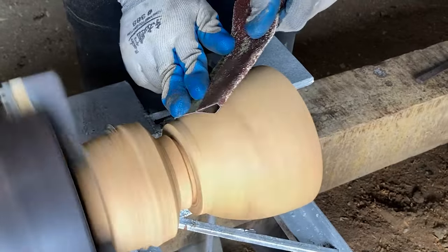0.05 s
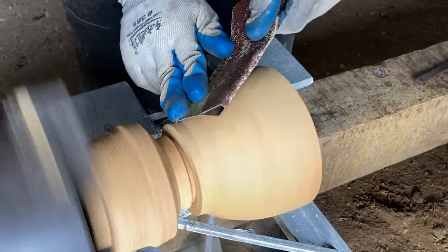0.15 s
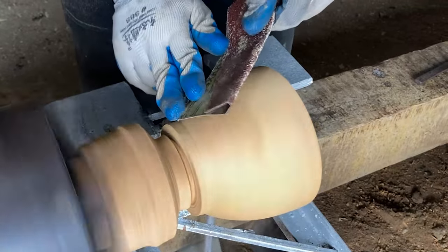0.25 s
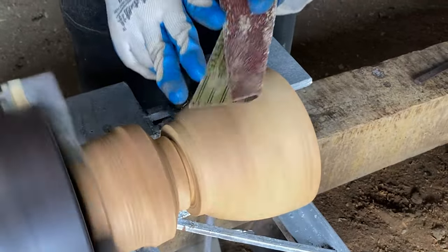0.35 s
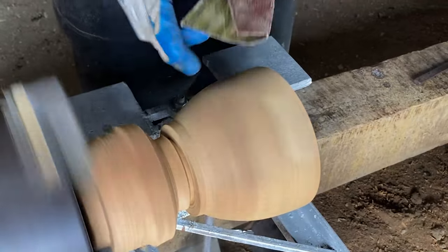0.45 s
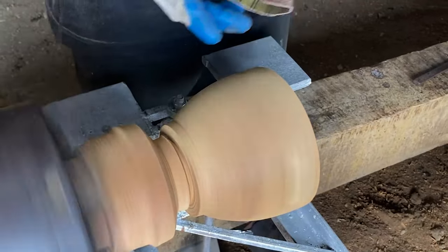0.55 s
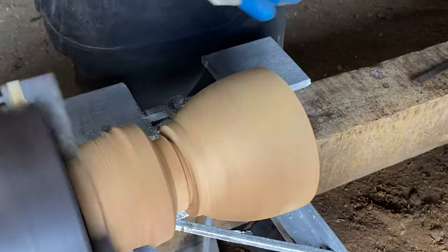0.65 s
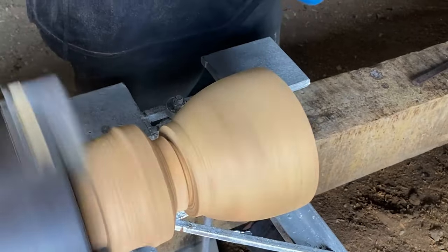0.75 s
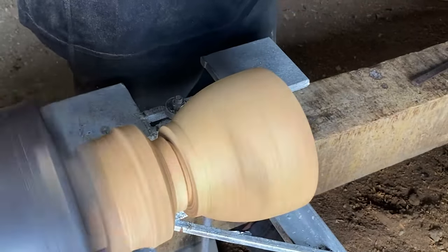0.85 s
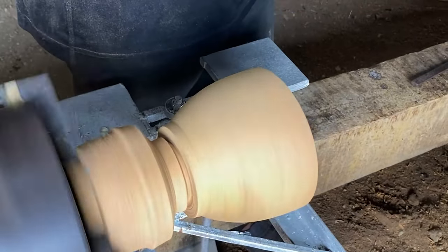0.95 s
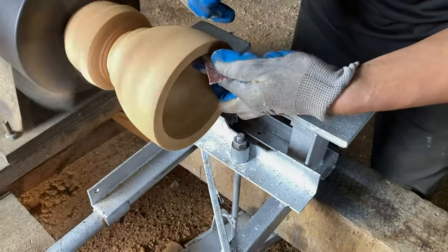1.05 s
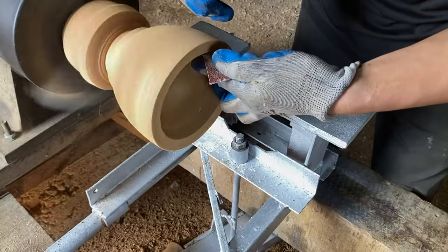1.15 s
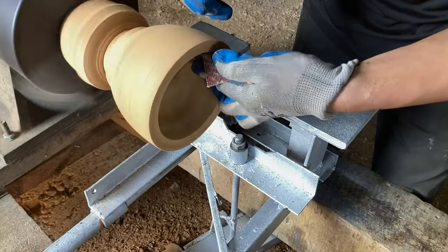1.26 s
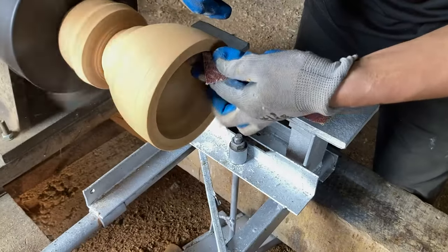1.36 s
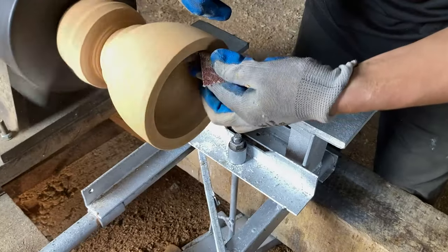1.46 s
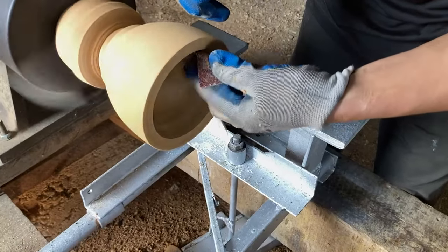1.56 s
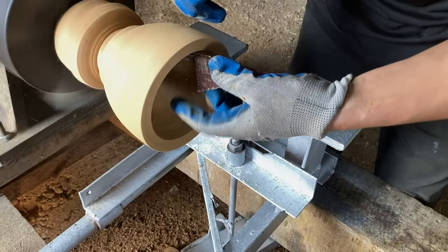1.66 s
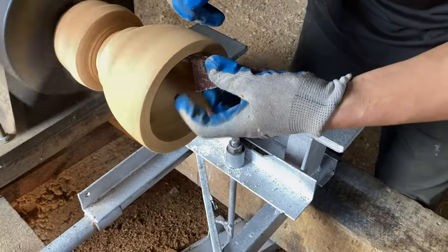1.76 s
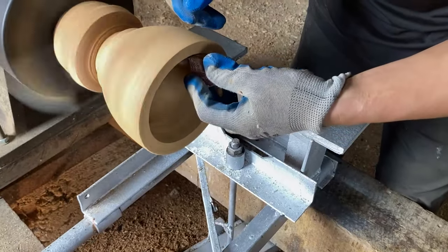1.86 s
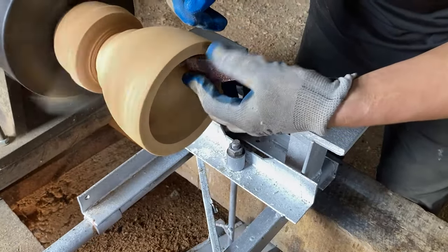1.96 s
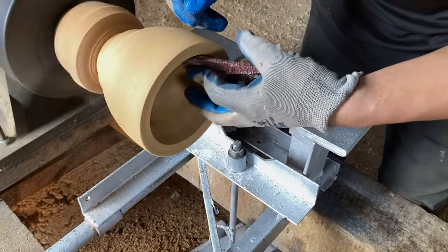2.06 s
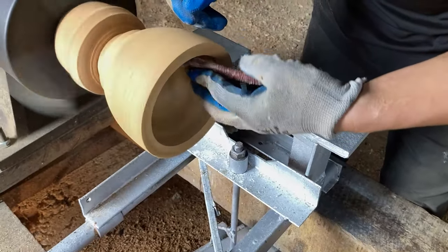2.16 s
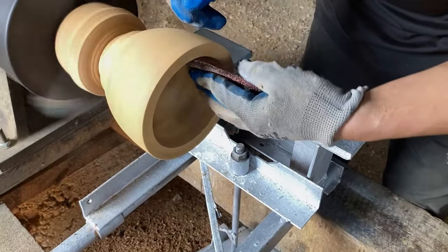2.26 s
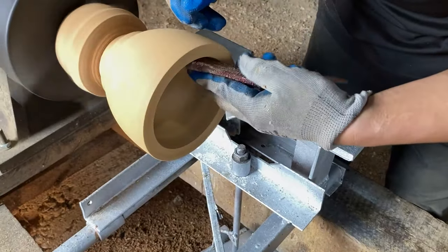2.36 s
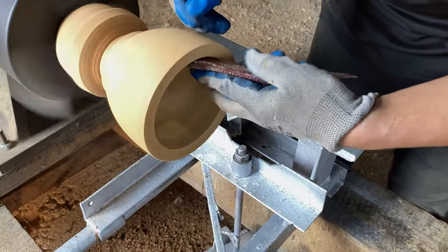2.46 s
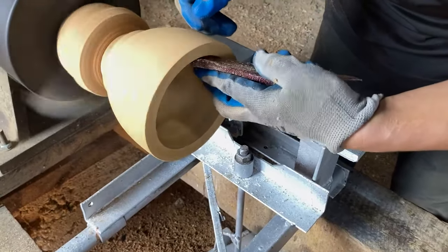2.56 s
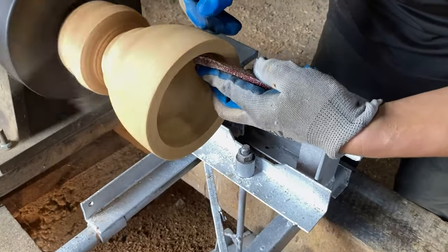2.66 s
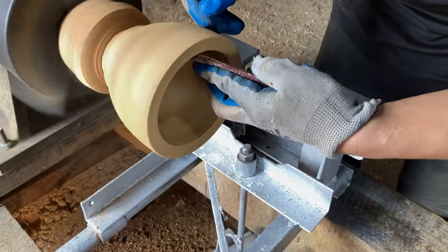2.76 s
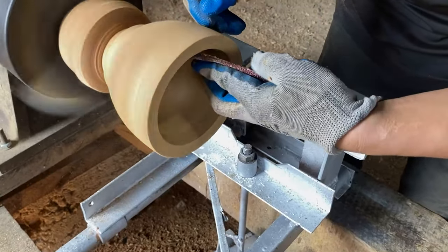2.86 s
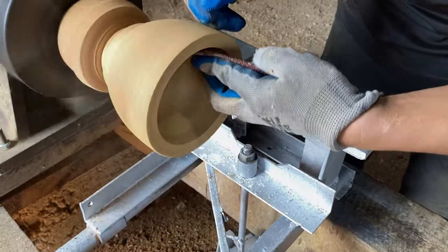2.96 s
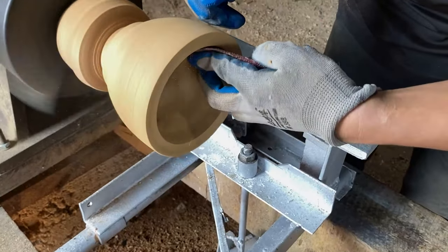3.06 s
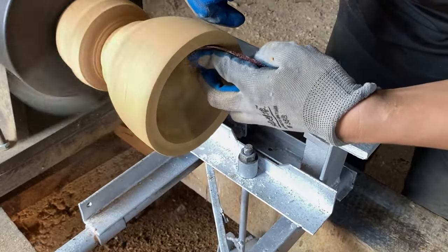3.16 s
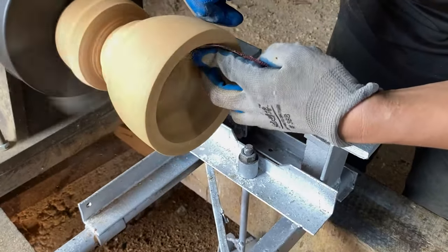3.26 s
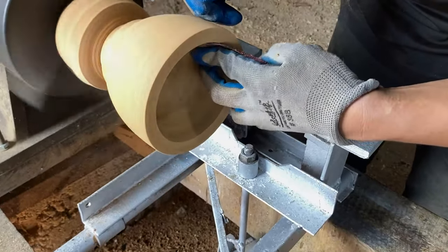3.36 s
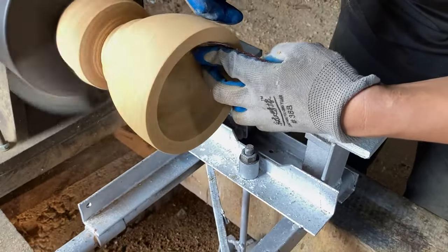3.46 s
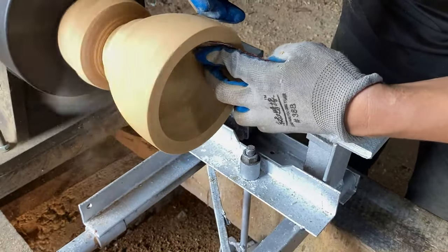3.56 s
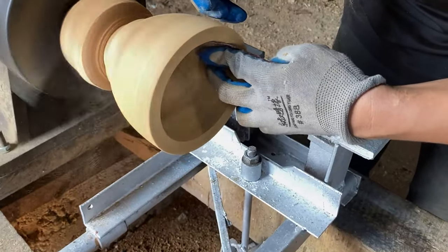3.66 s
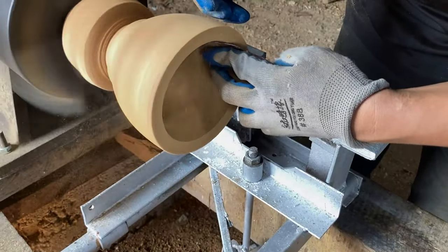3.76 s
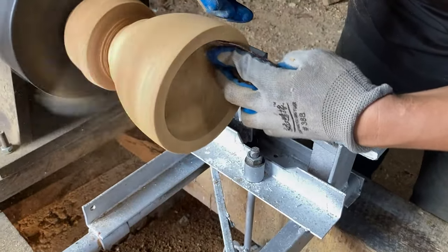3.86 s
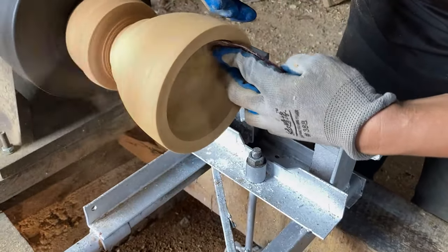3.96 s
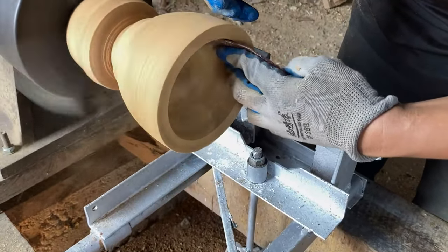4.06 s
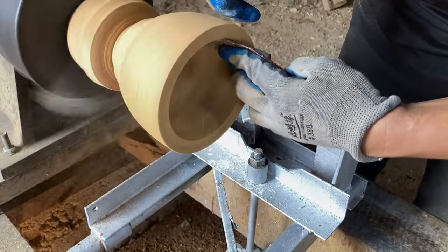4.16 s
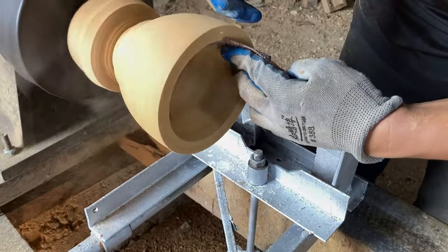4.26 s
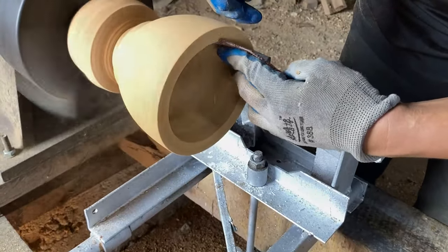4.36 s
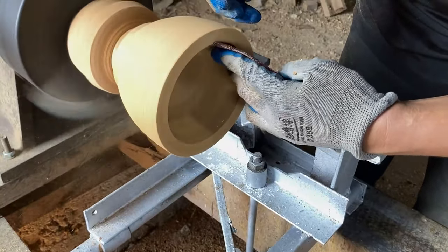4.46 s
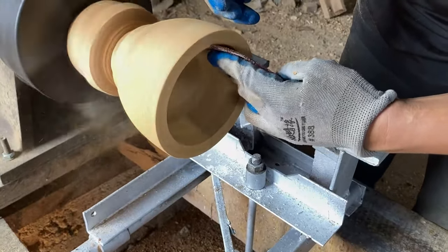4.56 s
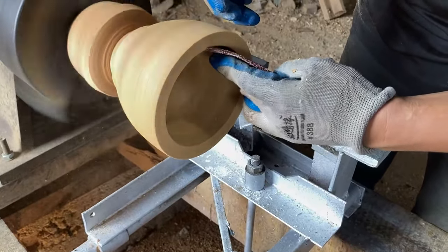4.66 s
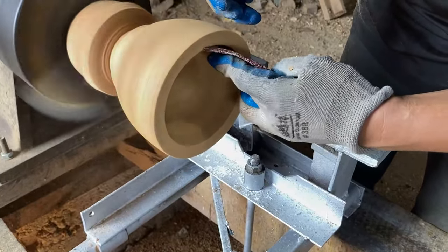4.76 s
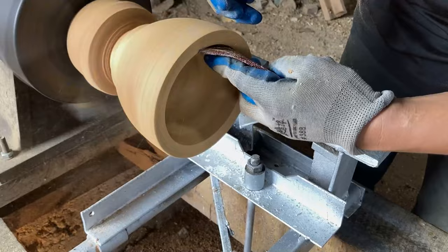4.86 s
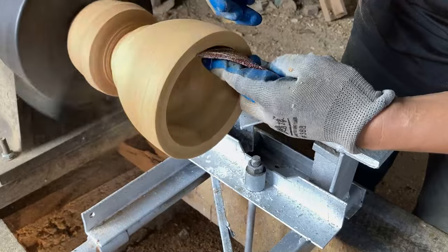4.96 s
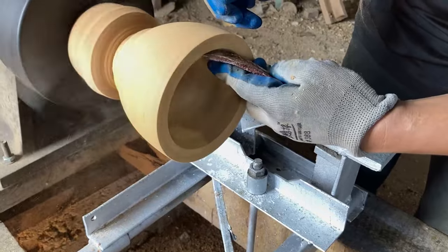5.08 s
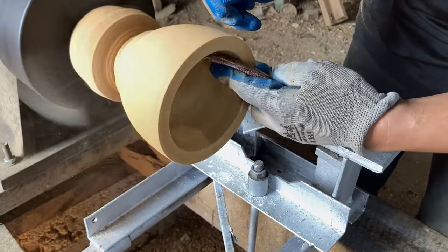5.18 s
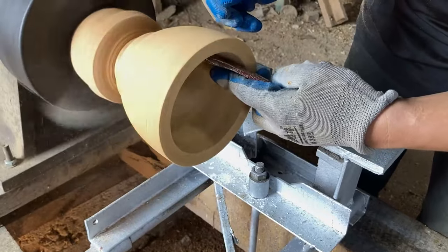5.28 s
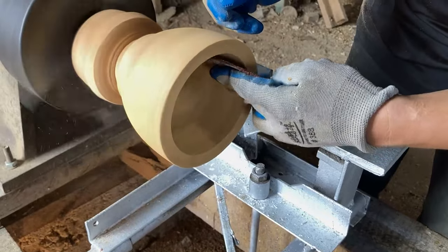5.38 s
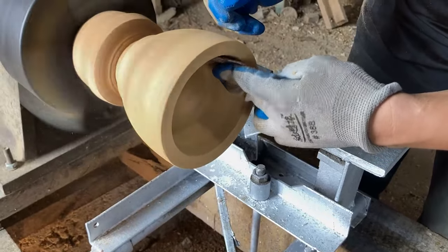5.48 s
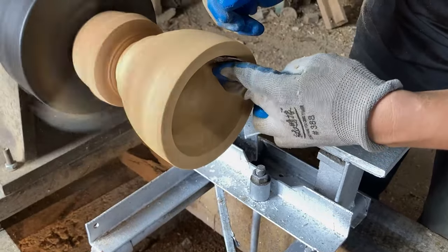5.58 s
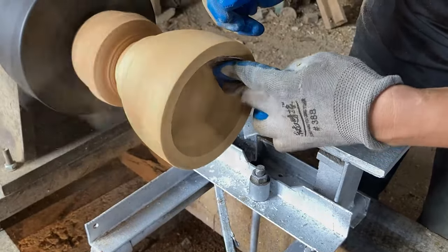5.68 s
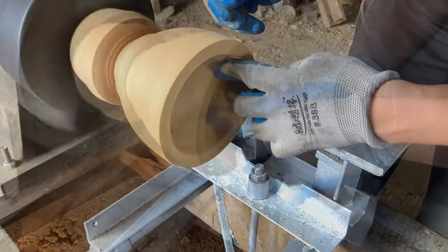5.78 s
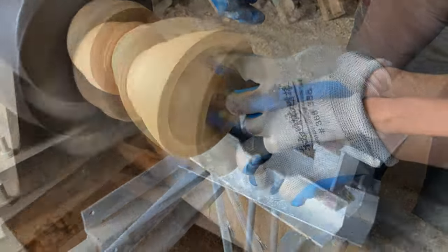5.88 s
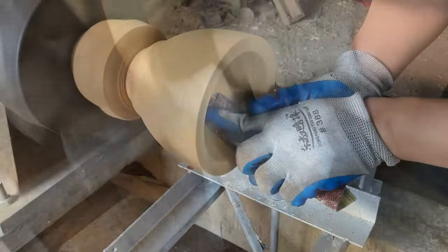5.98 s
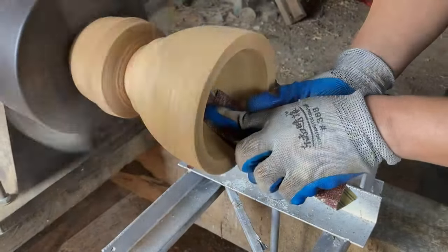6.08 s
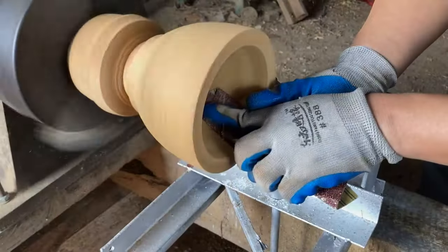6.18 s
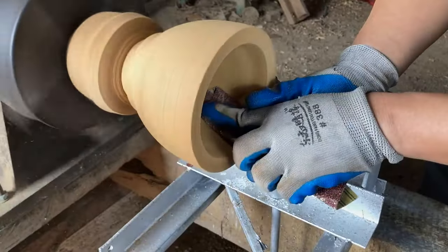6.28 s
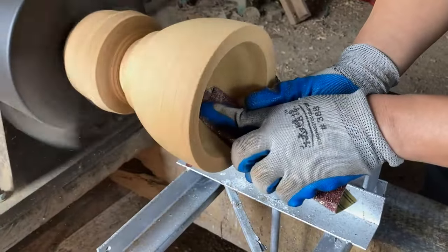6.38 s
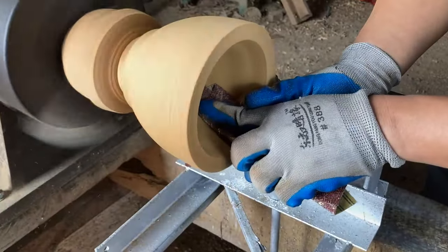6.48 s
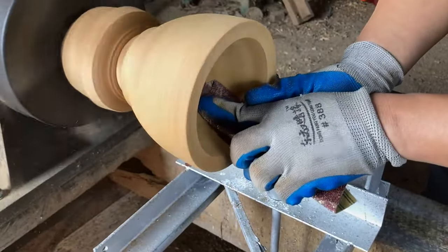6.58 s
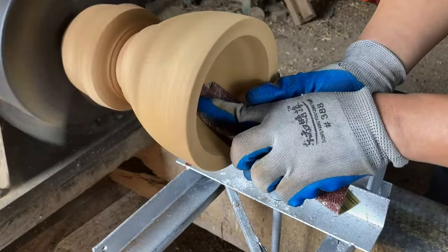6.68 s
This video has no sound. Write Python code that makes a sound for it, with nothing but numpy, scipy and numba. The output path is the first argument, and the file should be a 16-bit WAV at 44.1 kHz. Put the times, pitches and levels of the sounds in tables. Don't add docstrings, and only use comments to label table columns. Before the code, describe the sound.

A wood lathe runs throughout, close to a stereo phone microphone in an open workshop: a steady, slightly wavering motor hum around a nasal mid pitch, with low frame rumble and fine bearing rattle. From 0 to 0.3 s sandpaper hisses on the outside of a spinning wooden cup, swelling briefly, then lifting away by 0.4 s. The machine runs alone, with barely audible tiny squeaks, until an abrupt cut at 1.07 s. Now grit rubs inside the cup's mouth, brighter and hollow, with woody ringing and a fast throb each turn. Around 1.3 to 2 s it is jerky, with small groans, lifts and rough catches. It presses harder from 2 to 4 s, with a sharp squeal at 2.9 to 3 s. A low groan comes near 4 s; faint knocks near 5 s. Rubbing thins around 5.3 s, partly returns by 5.9 s, then softens, still continuing at the end, about 6.7 s.

```python
import sys
import numpy as np
from scipy import signal
from scipy.fft import rfft, irfft, next_fast_len
from scipy.io import wavfile
from scipy.ndimage import uniform_filter1d, map_coordinates
from numba import njit

SR = 44100
rng = np.random.default_rng(int(sys.argv[2]) if len(sys.argv) > 2 else 0)


def output_pcm(signal):
    pcm = np.clip(np.atleast_2d(signal).T, -1, 1) * 32767
    wavfile.write(sys.argv[1], SR, np.round(pcm).astype(np.int16))


def to_linear_factor(level_db):
    exponent = np.asarray(level_db, float) / 20
    return 10 ** exponent


N = 296793
T = np.arange(N) / SR
M = next_fast_len(N)
F = np.arange(M // 2 + 1) * SR / M
JUMP_S = 1.0712
INSIDE = T > JUMP_S
SPINDLE_HZ = 11.06

# freq_hz, right_lead_rad, likeness_0_1, left_minus_right_db
PORTS = [(0, .35, 0.995, 0), (90, 0.3, 1, 0.2), (367, 0.15, 0.99, 0.2), (782, -1.43, 0.81, 1.5),
         (1180, -1.46, 1, 4.5), (1654, -0.6, 0.4, 0), (1800, -2.5, 0.07, 0), (2590, -0.1, 0, 4.5),
         (3440, -2, 0.64, -0.5), (3660, -2.2, 0.4, 0.1), (3900, -2.0, 0.4, 0.1), (4370, -1.8, 0.21, 0.5),
         (5500, -2, 0.53, -0.5), (5920, -2, 0.9, -1), (6200, -2, 0.24, -4.5), (6830, -1, 1, 0.5),
         (8400, 0, 0.7, -0.5), (8930, 0, 1, -0.5)]
# start_s, pressure_as_hiss_db
STROKE = [
    (0, -36),
    (.14, -33),
    (.23, -36.5),
    (.3, -46),
    (.35, -62),
    (.42, -90),
]


@njit
def svf(x, hz, width):
    y, b, l = np.empty(len(x)), 0., 0.
    for i in range(len(x)):
        g, k = np.tan(np.pi * hz[i] / SR), width[i] / hz[i]
        v = (b + g * (x[i] - l)) / (1 + g * (g + k))
        b, l, y[i] = 2 * v - b, l + 2 * g * v, k * v
    return y


def unit(x):
    return x / np.sqrt(np.mean(x ** 2))


def curves(tables):
    s, *columns = np.vstack(tables).T
    return [np.interp(T, s, column) for column in columns]


def walk(rate):
    hold = int(SR / rate)
    held = np.repeat(rng.standard_normal(N // hold + 1), hold)
    return 1.08 * uniform_filter1d(uniform_filter1d(held, hold), hold)[:N]


def steps(rows, rest, slew_s):
    out = np.full(N, 1. * rest)
    for start, end, value in rows:
        out[(T >= start) & (T < end)] = value
    return uniform_filter1d(out, int(slew_s * SR), mode="nearest")


def dips(rows):
    return sum(depth * np.exp(-((T - s) / length) ** 2) for s, depth, length in rows)


def colour(x, table):
    hz, db = np.transpose(table)
    gain = to_linear_factor(np.interp(np.log(F + 1), np.log(hz), db))
    return unit(irfft(rfft(x, M) * gain, M)[:, :N])


def ring(level, hz, width, flicker_db=1.5, rate=18):
    hz, width = hz * np.ones(N), width * np.ones(N)
    rows = rng.standard_normal((2, N)) * level / np.sqrt(width)
    rows = np.array([svf(svf(row, hz, width), hz, 1.7 * width) for row in rows])
    return unit(rows) * to_linear_factor(flicker_db * walk(rate))


def sandpaper():
    # freq_hz, density_db_per_hz
    hiss_spectrum = [(5000, -42), (8500, -3), (10500, -2), (12500, -5), (14500, -5.5), (16000, -12.5)]
    # freq_hz, width_hz, gain_db
    cup_modes = [(3723, 100, 5), (5370, 100, 3), (5730, 180, 1.5), (6450, 170, -4), (7340, 1300, 4)]
    # start_s, width_factor
    grips = [
        (0, 4.5),
        (1.07, 2.2),
        (1.3, 1.3),
        (2.2, .9),
        (3.45, 1.4),
        (4.2, 1.15),
        (5.22, 2.5),
        (6.0, 3.4),
    ]
    # start_s, wall_hz, rim_hz, wall_db, rim_db, middle_db, bed_db
    fingers = [(1.08, 3280, 2600, -4.5, 2.5, 3.5, 0.5), (1.45, 3350, 2620, 6, -6.5, -6, 1),
               (1.56, 3420, 2640, -4, -0.5, -11, 2), (1.8, 3330, 2700, 0, 3, -3.5, -2),
               (1.97, 3280, 2500, 4.5, -3, -2, -1.5), (2.2, 3250, 2560, 2.5, -3, 0, 2.5),
               (2.42, 3200, 2600, 1.5, -1, 0.5, 2.5), (2.6, 3190, 2540, -2.5, 2, -1, 4),
               (2.95, 3256, 2530, 4, -2, -1.5, 1.5), (3.15, 3280, 2640, 6.5, -3.5, -6.5, -2),
               (3.38, 3310, 2560, 6, 1, -3, -2), (3.48, 3250, 2610, -0.5, 1, 1.5, 2),
               (3.9, 3210, 2530, -2.5, 2, -1.5, 2.5), (4.45, 3240, 2490, 1, -3, -1.5, -3),
               (5.2, 3130, 2600, -2.5, 1.5, 1, -5), (5.7, 3200, 2590, 2, 4.5, -1, -3),
               (6.0, 3250, 2570, 2, -1.5, 0, 2), (6.73, 3150, 2620, -2.5, -6.5, -5, -2)]

    hiss_db, (bite_db, cavity_db, wall_db, middle_db, low_db, bed_db, rim_db) = hand()
    damp = steps([(s, 9, factor) for s, factor in grips], 1, .12)
    mute_db = 0.5 * np.log2(damp) * INSIDE
    wall_hz, rim_hz, wall_held_db, rim_held_db, middle_held_db, bed_held_db = curves([fingers])
    wall_db = wall_db - mute_db + wall_held_db * INSIDE
    middle_db = middle_db - mute_db + middle_held_db * INSIDE
    rim_db = rim_db + rim_held_db * INSIDE
    bed_db = bed_db + bed_held_db * INSIDE

    grit = to_linear_factor(1.7 * rng.exponential(1, N)) * grain() * rasp() * catches(hiss_db)
    hiss = to_linear_factor(3.44) * colour(rng.standard_normal((2, N)) * grit, hiss_spectrum)
    rub = to_linear_factor(hiss_db) * (hiss + gaps(grit))
    bite_hz = np.where(INSIDE, 8100, 7050) * (1 + 0.096 * walk(7.8))
    rub = rub + to_linear_factor(bite_db) * ring(grit, bite_hz, 3700)
    rub = rub + to_linear_factor(cavity_db) * ring(grit, 4160 * (1 + 0.07296 * walk(7.6)), 3200)

    cup_db = sum(db / (1 + (2 * (F - hz) / width) ** 2) for hz, width, db in cup_modes)
    rub = np.where(INSIDE, to_linear_factor(-2.0) * irfft(rfft(rub, M) * to_linear_factor(cup_db), M)[:, :N], rub)

    grit = grit * grain(depth_db=0.97) * to_linear_factor(0.65 * walk(10))
    wall = ring(grit, wall_hz * (1 + 0.005 * walk(8.3)), 170 * damp, flicker_db=0.9, rate=28)
    wall = wall + to_linear_factor(-9.0) * ring(grit, 2860, 740)
    body = to_linear_factor(middle_db) * ring(grit, 1655, 120 * damp, flicker_db=2.2)
    body = body + to_linear_factor(low_db) * ring(grit, 1120.0, 385.0, flicker_db=2.0)
    body = body + to_linear_factor(middle_db - 4.0) * ring(grit, 1415, 340)
    body = body + to_linear_factor(bed_db) * ring(grit, 2050.0, 600)
    body = body + to_linear_factor(rim_db) * ring(grit, rim_hz * (1 + 0.0094 * walk(6.2)), 230 * damp)
    return (rub + to_linear_factor(wall_db) * wall + body + squeals(grit)) * touching()


def hand():
    # start_s, pressure_as_hiss_db, cover_0_1, wall_freedom_0_1, depth_0_rim_1_deep
    poses = [(1.072, -41, 0.63, 0.77, 0.54), (1.36, -36, 0.23, 0, 0), (1.6, -39, 0.3, 0.9, 0.61),
             (2.04, -34, 0.37, 0.46, 0.3), (2.76, -36, 0.41, 1, 1), (3.2, -34.5, 0.61, 0.78, 0.38),
             (3.4, -33.5, 0.56, 0.89, 0), (3.56, -36.0, 0.72, 0.7, 0), (4.0, -34.5, 0.76, 0.25, 0.71),
             (4.24, -39, 0.7, 0.16, 1.0), (4.6, -38, 0.5, 0.39, 0.86), (4.96, -38.5, 0.77, 0.35, 0.89),
             (5.32, -46.5, 0.01, 0.8, 0), (5.6, -40, 0.93, 0.64, 0.63), (5.92, -37.5, 0.5, 0.62, 0.15),
             (6.04, -40, 0.55, 0.71, 0.45), (6.32, -43, 0.43, 0.52, 0.99), (6.73, -43.5, 0.06, 0.83, 0.67)]
    # level_db, pressure_share, covered_db, free_db, deep_db
    parts = [
        (-34.5, 1, 0.5, 1, -0.7),
        (-40, 0.75, 9, 4.25, 1),
        (-44.5, 0.79, -5.5, 14, 1.2),
        (-51, 0.82, -2.5, 9, 7.5),
        (-44, 1, -7.5, 2, 3.8),
        (-33, 0.58, -22, -4, 2.5),
        (-39, 0.52, -2.1, 6.5, -1.5),
    ]
    outside_parts = [-40.5, -41, -49, -52.5, -57, -54, -44.5]
    # centre_s, loss_db, length_s
    lifts = [(1.265, 10, 0.027), (1.46, 7, 0.051), (1.808, 4, 0.024), (1.915, -1.5, .015),
             (2.03, -3, 0.011), (2.57, 1.5, .02), (2.73, 3, .016), (2.835, 0, .015), (2.93, 1.5, 0.011),
             (3.02, 3, 0.0051), (3.068, 3.5, 0.018), (3.125, 0.5, 0.022), (5.262, 2, 0.041)]
    # centre_s, cover_lost_0_1, length_s
    peeks = [
        (1.2, 0.1, 0.04),
        (1.33, 0.11, 0.017),
        (2.33, 0.27, 0.11),
        (2.62, 0.04, 0.057),
        (2.98, 0.3, 0.018),
        (3.95, 0.04, .05),
    ]

    inside_db, *pose = curves([poses])
    hiss_db = np.where(INSIDE, inside_db, curves([STROKE])[0]) - dips(lifts)
    pose[0] = pose[0] - dips(peeks)
    excess_db = hiss_db + 38
    part_levels = []
    for (db, share, *tilt_db), out_db in zip(parts, outside_parts):
        posed_db = np.where(INSIDE, db + np.dot(tilt_db, pose), out_db)
        part_levels.append(posed_db + share * excess_db)
    return hiss_db, part_levels


def touching():
    return 1. - (T > STROKE[-1][0]) * (T < JUMP_S)


def grain(depth_db=0.35, count=3):
    bumps = uniform_filter1d(rng.standard_normal((count, 48)), 3, mode="wrap") * np.sqrt(3)
    place = (T * SPINDLE_HZ % 1) * 48
    turn = 0
    for bump in bumps:
        height = np.interp(place, np.arange(49), np.append(bump, bump[0]))
        turn = turn + (0.69 + 1.56 * walk(0.66)) * height
    return to_linear_factor(depth_db * turn / np.sqrt(count) + 0.5 * walk(25.42))


def rasp(count=4):
    lift = 0
    for place in rng.random(count):
        since_ridge = (2 * T * SPINDLE_HZ + place) % 1
        lift = lift + np.clip(.5 + walk(1.51), 0, 2) * np.exp(-since_ridge / .12)
    return 1 + 0.22 * lift


def catches(hiss_db, over_db=31, hold_s=0.019):
    # start_s, peak_db
    events = [(1.3, -11), (1.3498, -11), (1.4341, -14), (1.4889, -8), (1.5209, -9.5), (1.5443, -10),
              (1.578, -8.5), (1.6316, -18), (1.7229, -14), (1.7628, -15), (1.8307, -14), (1.943, -3.5),
              (2.1016, -22), (2.3714, -16), (2.587, -26), (2.6997, -15), (2.754, -21), (2.8514, -9),
              (2.942, -7), (2.991, -6.5), (3.007, -6), (3.026, -7.5), (3.04, -12), (3.1482, -23),
              (3.1746, -16), (3.2325, -26), (3.3318, -26), (3.3547, -23), (3.5647, -24), (3.6675, -32),
              (3.7084, -19), (3.9089, -37), (4.1888, -15), (4.9147, -30), (4.9466, -17), (5.0972, -27),
              (5.1945, -28), (5.3644, -33), (5.3986, -33), (5.4719, -22), (5.5776, -28), (6.3973, -19),
              (6.6801, -23)]
    kicks = np.zeros(N)
    for s, db in events:
        i = int(s * SR)
        kicks[i] = to_linear_factor(db - hiss_db[i] - over_db)
    return 1 + signal.lfilter([1], [1, -np.exp(-1 / (hold_s * SR))], kicks)


def gaps(grit, patch_db=-15.0, count=6):
    # start_s, end_s, from_hz, to_hz, over_hiss_db
    upper = [
        (1.0, 1.22, 10800, 10000, 1.5),
        (1.25, 1.65, 8700, 7100, 2),
        (1.68, 2.08, 8100, 10600, 2),
        (2.2, 3.8, 7830, 8650, 1),
        (4.5, 5.3, 8340, 6700, -2),
        (5.4, 7.2, 8700, 8100, 4.5),
    ]
    # start_s, end_s, from_hz, to_hz, over_hiss_db
    lower = [
        (.95, 1.25, 5240, 4900, 4),
        (3.2, 3.78, 4930, 5100, -8),
        (3.75, 5.1, 3930, 5700, 0),
        (5.4, 5.7, 5460, 5700, -7),
        (5.71, 5.95, 4100, 3980, -18),
    ]
    out = 0
    for table, width in ((upper, 480), (lower, 380)):
        times = np.ravel([row[:2] for row in table])
        hz = np.interp(T, times, np.ravel([row[2:4] for row in table]))
        swell = 0
        for start, end, _, _, db in table:
            swell = swell + to_linear_factor(db) * np.sin(np.pi * np.clip((T - start) / (end - start), 0, 1))
        out = out + swell * ring(grit, hz, width) * INSIDE
    for hz in np.geomspace(4400, 12200, count):
        patch = ring(grit, hz * (1 + 0.047 * walk(2.2)), 0.06 * hz, flicker_db=6.0, rate=8)
        out = out + to_linear_factor(patch_db) * patch
    return out


def squeals(grit):
    # centre_s, level_db, pitch_hz, length_s
    events = [
        (0.06, -43, 6500, 0.011),
        (0.25, -43, 2740, 0.04),
        (1.342, -38.5, 1840, .03),
        (1.415, -38, 1730, .012),
        (2.93, -34, 6400, .04),
        (2.992, -29.5, 6250, .02),
        (3.953, -39, 1137, 0.071),
        (5.6, -43, 4300, .06),
    ]
    s, db, hz, length = np.transpose(events)
    nearest = np.searchsorted((s[1:] + s[:-1]) / 2, T)
    sung = ring(grit, hz[nearest], 0.049 * hz[nearest], flicker_db=-1.5)
    return sung * to_linear_factor(db[nearest]) * np.exp(-((T - s[nearest]) / length[nearest]) ** 2)


def bounce(direct, scattered):
    echo_s, sway_s, share = .0011, 0.00013, 0.42

    def late(delay_s):
        source = np.arange(N) - (delay_s + sway_s * walk(2.5)) * SR
        return map_coordinates(direct, [source], mode="mirror")

    near = direct + to_linear_factor(-9) * late(1.7 * echo_s)
    return near, np.sqrt(share) * late(echo_s) + np.sqrt(1 - share) * scattered


def hum():
    line_hz = [100.3, 200.5, 351.3, 524.2, 549.1, 649.4, 749.7, 774.6, 825.1, 850.1, 875.3, 925.6, 950.6,
               975.4, 1051.1, 1080.0, 1157.0]
    # first_place_db, second_place_db, first_left_minus_right_db
    line_levels = [(-13.5, -15, -1), (-25.5, -19.5, 2), (-35, -20, 2), (-41, -18.5, 2), (-40, -19.5, -6.5),
                   (-21, -25.5, -2), (3.5, -0.5, 6), (-21, -11, 5), (-14, -21, 4), (-11.5, -0.5, 0),
                   (-6.5, -9, 0), (-5, -13.5, 6), (-13, -28, -6), (-24, -11, 3), (-27, -7.5, -9),
                   (-16, -27, 13), (-17, -13, 3)]
    hz, lead, _, pan_db = np.transpose(PORTS)
    out = 0
    for f, (first_db, second_db, first_pan_db) in zip(line_hz, line_levels):
        rough = 1 + .09 * abs(second_db) * (f > 300) + .3 * (f > 860) * ~INSIDE
        phase = 2 * np.pi * (f * T + rng.random()) + rough * 0.56 * walk(9)
        size = to_linear_factor(np.where(INSIDE, second_db, first_db) + rough * 0.59 * walk(14))
        pan = to_linear_factor(-np.where(INSIDE, np.interp(f, hz, pan_db), first_pan_db))
        right = pan * np.sin(phase + np.interp(f, hz, lead))
        out = out + np.sqrt(2) * size * np.array([np.sin(phase), right])
    return out * to_linear_factor(4.0)


def rumble():
    # freq_hz, density_db_per_hz
    spectrum = [(28, -26), (80, -9.5), (160, -9), (280, -14), (330, -13), (365, -2.5), (410, -12.5),
                (480, -11), (800, -4.5), (1100, -6), (1500, -16.5), (2000, -17), (4100, -20), (5200, -31.5),
                (12000, -37)]
    shaft, balls = (np.exp(-(T * hz % 1) / 0.2) for hz in (25.1, 77.4))
    noise = rng.standard_normal((2, N))
    low = uniform_filter1d(noise, 15)
    rattle = (1 + 1.14 * shaft + 0.8 * balls * to_linear_factor(2.0 * walk(53))) / 1.2
    return to_linear_factor(0.5) * colour(low * to_linear_factor(1.8 * walk(24)) + (noise - low) * rattle, spectrum)


def knocks():
    # centre_s, level_db, pitch_hz, length_s
    frame = [
        (4.976, -47, 368, 0.018),
        (5.052, -40, 382, 0.013),
        (5.145, -40, 1200, 0.012),
    ]
    # centre_s, level_db, pitch_hz, length_s
    squeaks = [
        (0.48, -57, 4120, .008),
        (0.52, -58, 4550, .007),
        (0.548, -54, 4100, .008),
        (0.587, -54, 4100, .009),
        (0.96, -57, 4520, .008),
        (1.0, -58, 4450, .007),
        (1.04, -56, 4550, .008),
    ]
    out = 0
    for s, db, hz, length in frame + squeaks:
        out = out + to_linear_factor(db) * np.exp(-((T - s) / length) ** 2) * np.sin(2 * np.pi * hz * T)
    return out


def ports(direct, scattered, spread=1):
    # start_s, end_s, share_0_1, centre_hz, half_width_hz
    opposed = [(1.07, 6.9, .22, 5650, 520), (1.4, 3.7, .38, 3680, 140), (2.55, 3.03, .25, 3700, 170),
               (3.5, 3.68, .35, 3650, 170), (1.42, 1.54, .7, 2970, 130), (2.9, 4.1, .5, 2230, 100),
               (3.5, 5.35, .55, 1960, 170), (1.32, 1.43, .6, 5450, 350), (1.3, 1.4, .9, 3850, 250),
               (1.9, 2.22, .42, 5400, 300), (2.06, 2.13, .85, 3800, 250), (4.25, 4.51, .7, 5700, 520),
               (4.64, 4.84, .58, 5500, 400), (4.84, 5.05, .55, 5750, 400), (5.17, 5.42, .5, 5950, 330),
               (5.71, 5.95, .48, 5880, 320), (6.2, 6.37, .42, 5900, 400), (6.56, 6.9, .48, 5550, 400)]
    hz, *columns = np.transpose(PORTS)
    lead, like, pan_db = (np.interp(F, hz, column) for column in columns)
    lead = np.where(F > 6500, 2 * np.pi * F * 2.21e-4 + np.pi, lead)
    like = np.clip(like, 0, 1) ** spread
    left = rfft(direct, M)
    alike = np.sqrt(like) * np.exp(1j * lead) * left
    askew = to_linear_factor(-pan_db) * (alike + np.sqrt(1 - like) * rfft(scattered, M))
    right, turn = irfft(askew, M)[:N], -left - askew
    for start, end, share, centre, width in opposed:
        band = irfft(np.exp(-((F - centre) / width) ** 4) * turn, M)[:N]
        right = right + steps([(start, end, share)], 0, .05) * (1 + .2 * walk(14)) * band
    return np.array([direct, right])


def scene():
    # start_s, hum_db
    motor_levels = [
        [(0.0, -46), (1.06, -45.5)],
        [(1.07, -43.5), (2.95, -44), (3.11, -47), (3.44, -47.5), (3.7, -49.5), (5.42, -51), (5.83, -47),
         (6.73, -48.5)],
    ]
    motor = to_linear_factor(curves(motor_levels)[0])
    paper = ports(*bounce(*sandpaper()))
    frame = ports(*(motor * rumble() + knocks()), spread=1.5)
    return paper + frame + motor * hum()


def band_limit(x):
    return signal.sosfilt(signal.butter(12, 17090, fs=SR, output="sos"), x)


def record(dry):
    limit, top_hz = .55, 15780
    rounded = limit * np.tanh(dry / limit)
    finished = irfft(rfft(rounded, M) * (F < top_hz), M)[:, :N]
    return band_limit(finished)


dry = scene()
out = record(dry)
output_pcm(out)
```